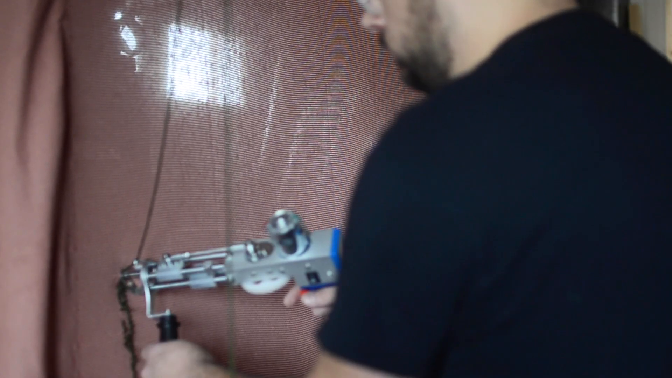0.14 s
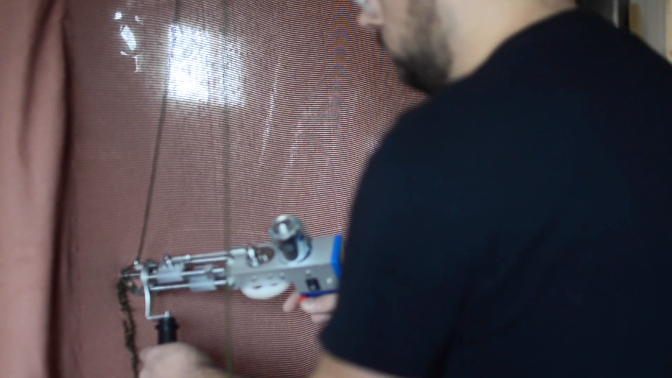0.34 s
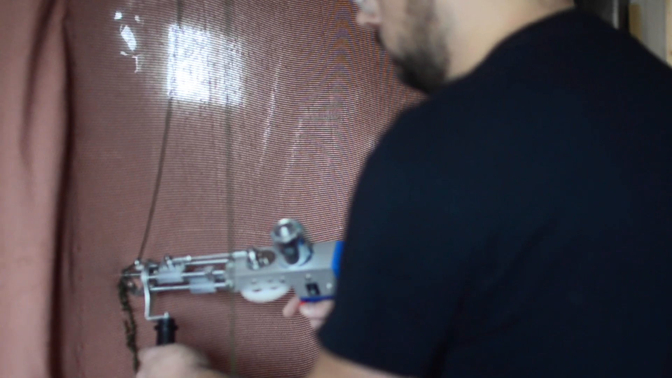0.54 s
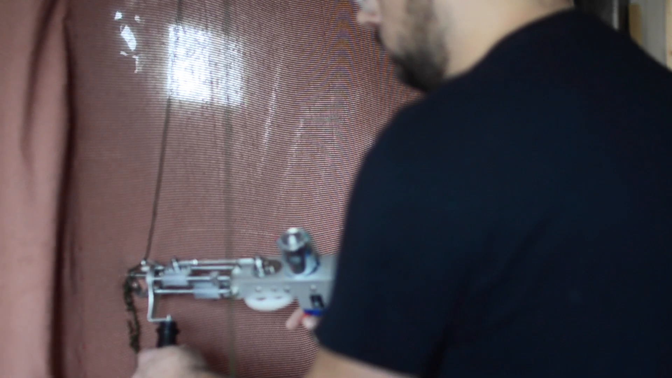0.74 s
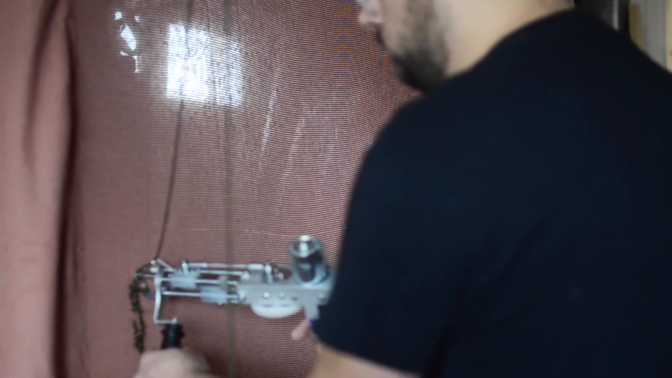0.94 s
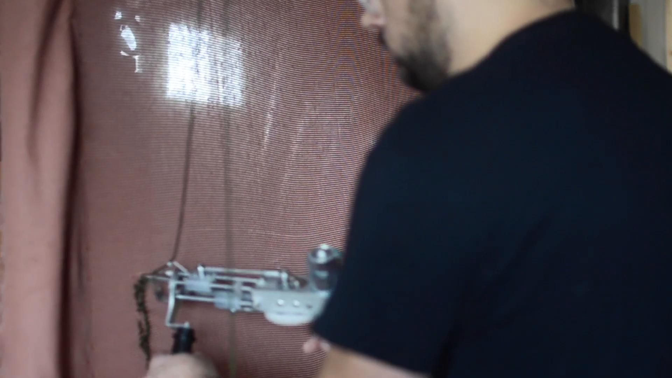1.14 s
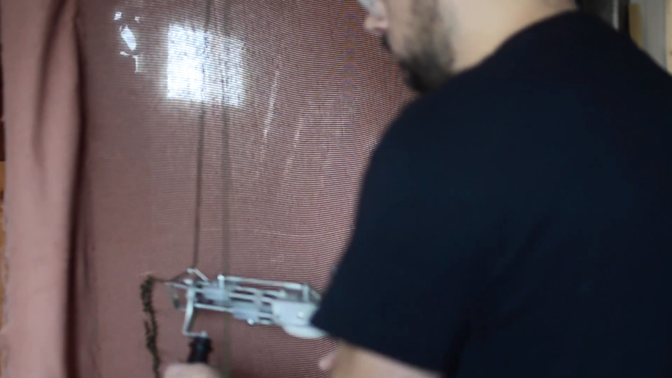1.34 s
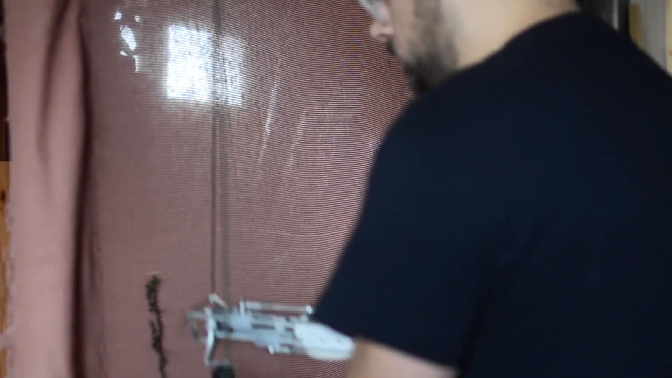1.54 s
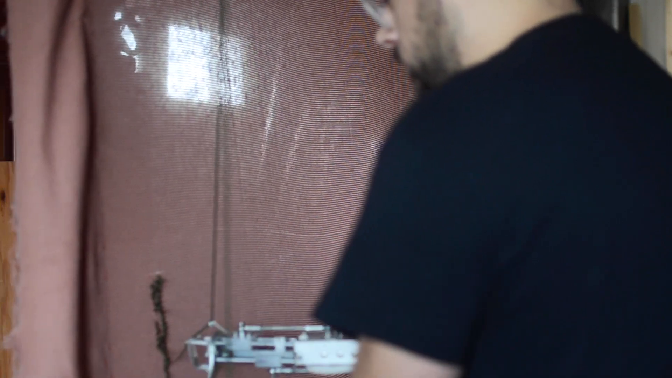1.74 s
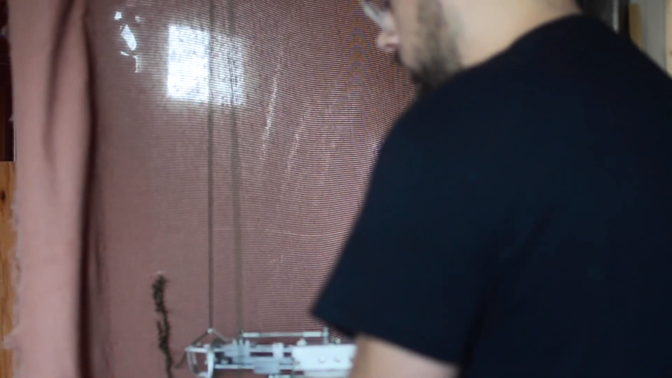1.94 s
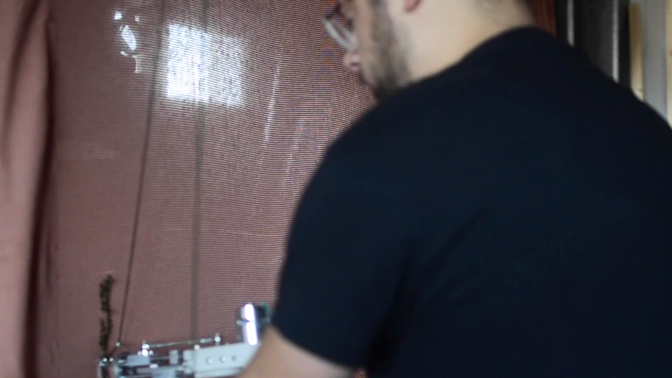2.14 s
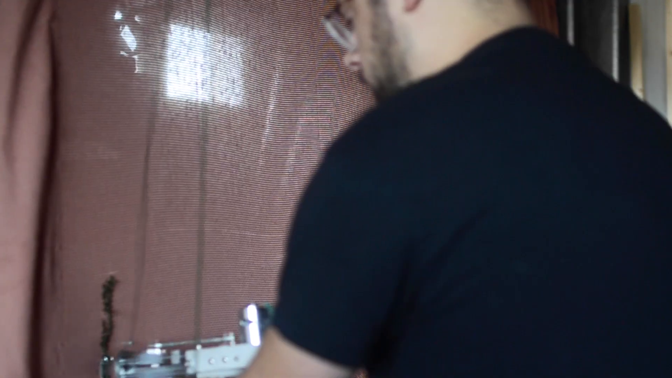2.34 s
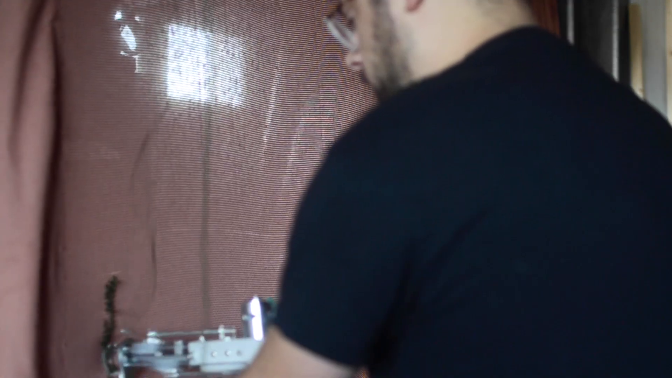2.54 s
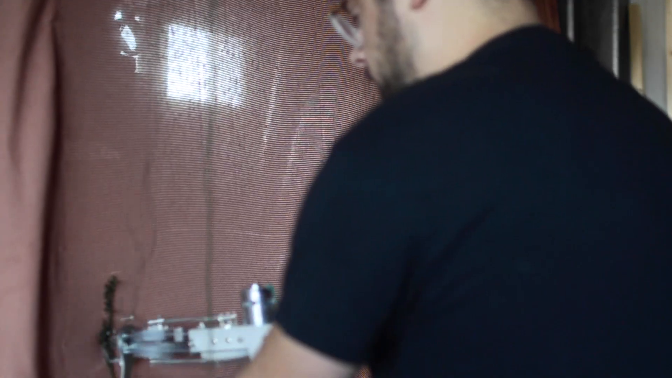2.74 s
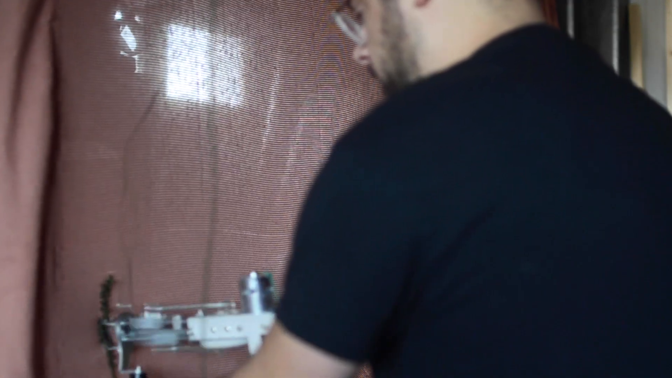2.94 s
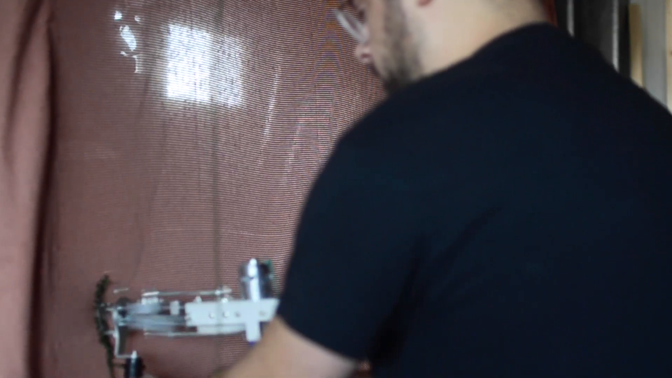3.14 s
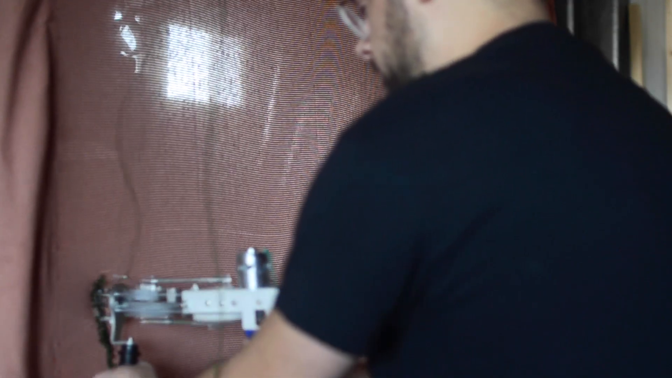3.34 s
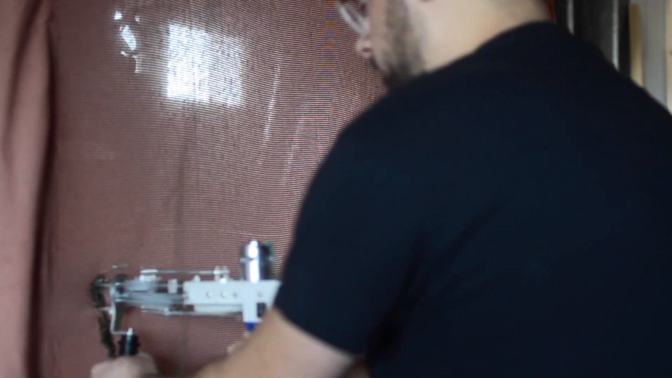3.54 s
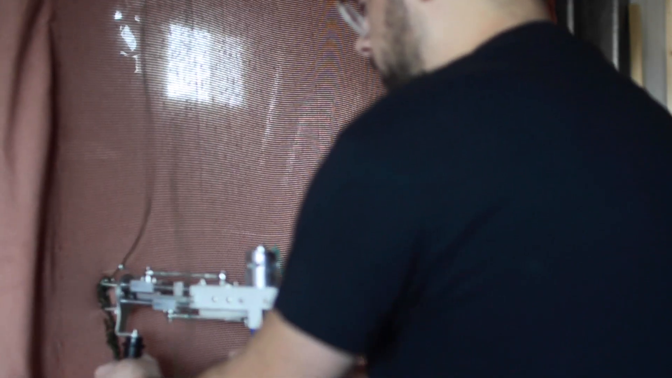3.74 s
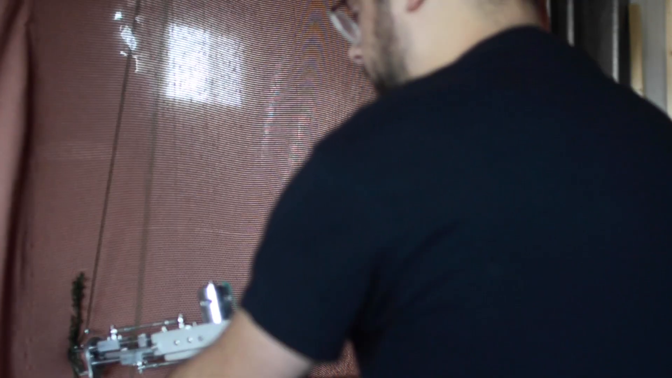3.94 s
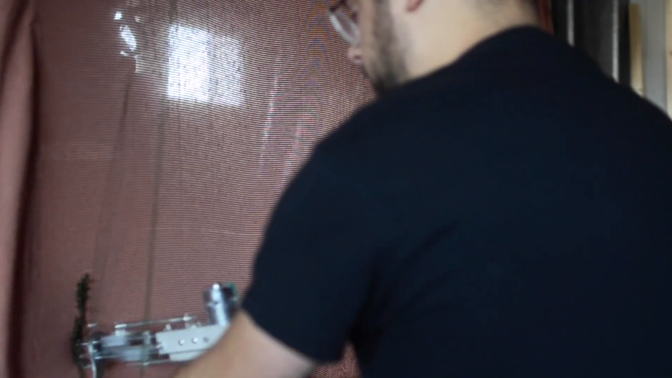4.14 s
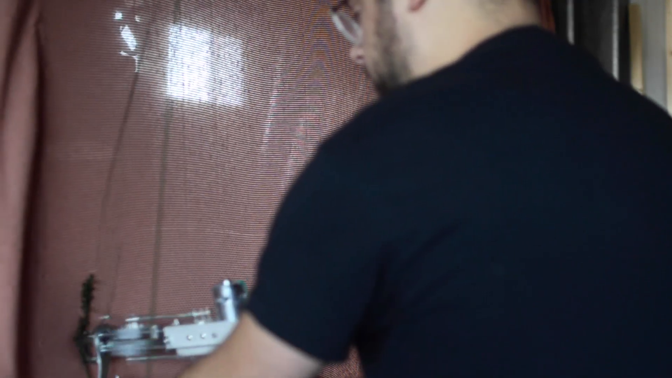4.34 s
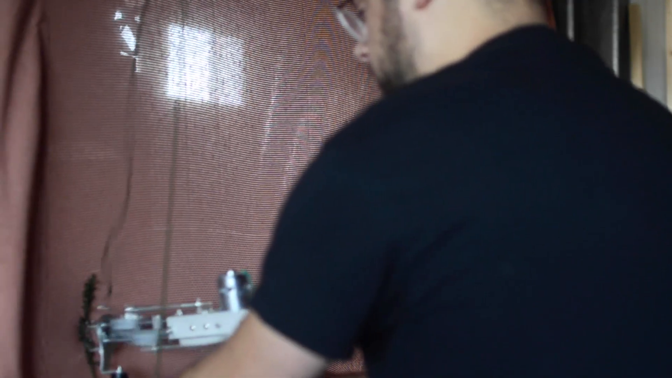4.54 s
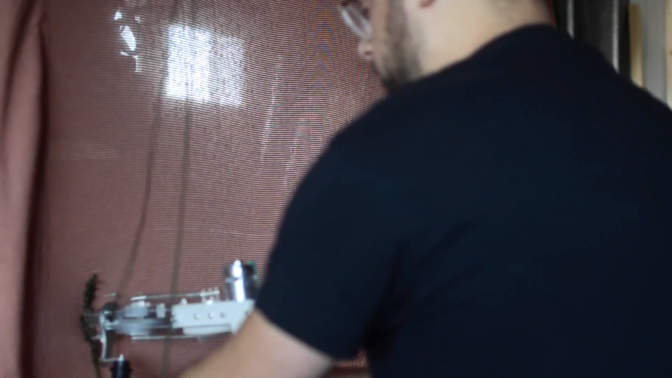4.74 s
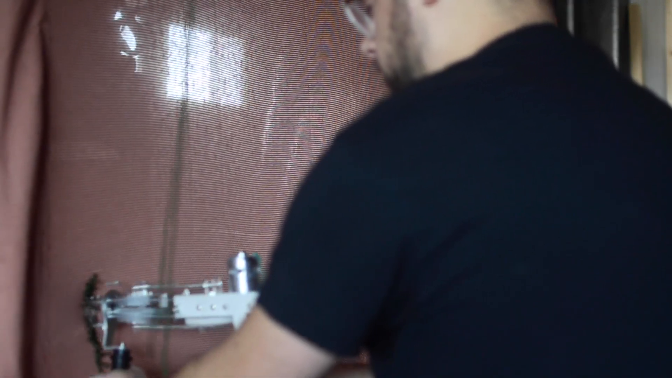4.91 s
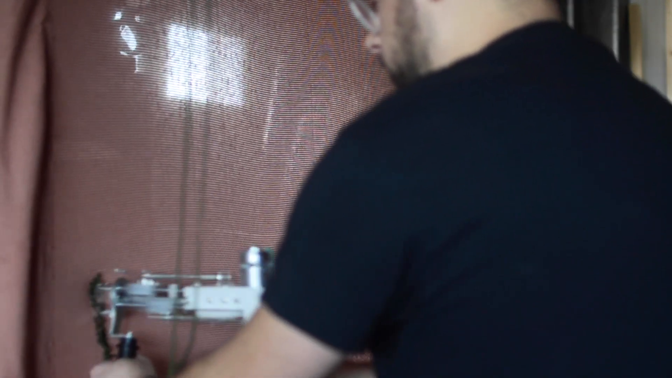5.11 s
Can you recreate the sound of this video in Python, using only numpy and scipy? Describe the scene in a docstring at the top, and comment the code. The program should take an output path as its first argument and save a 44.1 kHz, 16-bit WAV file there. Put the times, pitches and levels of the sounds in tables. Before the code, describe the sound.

A fan hums in a small room while an electric tufting gun clinks, then fires two bursts of fast metallic buzzing chatter.

```python
"""A small room with a fan running; close to the microphone an electric tufting gun punches yarn through cloth.
The fan is coloured noise, housing resonances and hum. Before and between the gun's two bursts it is handled:
short noise bursts clink and knock, detuned sines ring a steel rod, and hiss brushes the cloth.
The trigger switch clicks as each burst starts; gear sines and dense impacts whine and rattle through the
resonant metal frame; on every turn of the crank the needle thumps the cloth (low harmonics) and the
scissors snip (clicks into blade resonances)."""
import sys
import numpy as np
from scipy import signal
from scipy.fft import rfft, irfft
from scipy.io import wavfile

SR = 44100
rng = np.random.default_rng(int(sys.argv[2]) if len(sys.argv) > 2 else 0)


def dump(signal):
    """Clip the signal to [-1, 1] and save it as 16-bit WAV at the path in sys.argv[1]."""
    limited = np.clip(np.atleast_2d(signal).T, -1, 1)
    pcm = np.round(limited * 32767).astype(np.int16)
    wavfile.write(sys.argv[1], SR, pcm)


N = 228155
T = np.arange(N) / SR


def from_db(db):
    """Decibels to gain."""
    return 10 ** (np.asarray(db) / 20)


def rms_one(x):
    """Scale to unit power."""
    return x / np.sqrt(np.mean(x ** 2) + 1e-20)


def colour(x, spectrum):
    """Give x a smooth spectrum that falls away beyond both ends; rms 1."""
    hz, db = np.transpose(spectrum)
    f = np.maximum(np.arange(N // 2 + 1) * SR / N, 1)
    ends = np.minimum(1, f / hz[0]) ** 2 * np.minimum(1, hz[-1] / f) ** 2
    gain = from_db(np.interp(np.log(f), np.log(hz), db))
    return rms_one(irfft(rfft(x) * ends * gain, N))


def noise(spectrum):
    """Coloured noise, rms 1."""
    return colour(rng.standard_normal(N), spectrum)


def drift(rate):
    """Smooth chance with spread 1, changing about rate times a second."""
    r = np.exp(-2 * np.pi * rate / SR)
    wander = signal.lfilter([1], [1, -2 * r, r * r], rng.standard_normal(2 * N))
    return rms_one(wander[N:])  # the first half lets the filter settle


def resonate(x, modes):
    """Parallel damped resonances of alternating sign."""
    out = np.zeros(N)
    for k, (hz, width_hz, db) in enumerate(modes):
        r = np.exp(-np.pi * width_hz / SR)
        poles = [1, -2 * r * np.cos(2 * np.pi * hz / SR), r * r]
        ring = (1 - r * r) / 2 * signal.lfilter([1, 0, -1], poles, x + 1e-18)
        out += (-1) ** k * from_db(db) * ring
    return out


# spectrum of the fan's air: (f/Hz, relative level per Hz/dB)
AIR_SPECTRUM = [(25, -10), (55, -19.5), (85, -8), (125, -16.5), (230, -12.5), (450, -9), (780, -4),
                (1100, -10.5), (1550, -12.5), (2400, -25), (3300, -23), (4500, -36), (7000, -46.5),
                (16000, -46)]
# fan housing resonances: (f/Hz, width/Hz, relative level/dB)
HOUSING_MODES = [(435, 11, -1.5), (594, 15, -2), (736.3, 9.3, 4.5), (857.6, 28, 2.5), (912, 41, -6)]
# fan motor's hum and a faint electrical whistle: (f/Hz, rms level/dB)
HUM_TONES = [(92.3, -63.5), (184.6, -61), (14971, -71), (15030, -76)]


def fan():
    """Nearly steady air noise, the housing's resonances and wavering tones, present throughout."""
    air = from_db(-44 + 0.37 * drift(4)) * noise(AIR_SPECTRUM)
    housing = from_db(-45) * rms_one(resonate(rng.standard_normal(N), HOUSING_MODES))
    hum = np.zeros(N)
    for hz, db in HUM_TONES:
        level = np.sqrt(2) * from_db(db + 1.4 * drift(5.2))
        hum += level * np.sin(2 * np.pi * hz * T + .5 * drift(7.4))
    return air + housing + hum


def decay(start, t60, rise_s=0.00049):
    """An envelope that rises quickly and dies away, 60 dB in t60 seconds."""
    since = np.maximum(T - start, 0)
    return (1 - np.exp(-(since / rise_s) ** 2)) * from_db(-60 * np.minimum(since / t60, 4))


def blows(rows, spectrum):
    """Each blow wakes many damped modes at once: a burst of noise that dies quickly."""
    return noise(spectrum) * sum(from_db(db) * decay(s, t60) for s, db, t60 in rows)


# clinks of handled metal parts, and the trigger switch at 2.362 and 4.023 s: (t/s, level/dB, t60/s)
CLINK_AND_SWITCH_TIMES = [(1.258, -47, 0.39), (1.774, -41.5, 0.24), (2.097, -49, .1), (2.362, -26, 0.13),
                          (3.797, -50, 0.11), (3.911, -45.5, .015), (4.023, -16, 0.031)]
# their bright spectrum: (f/Hz, relative level per Hz/dB)
CLINK_AND_SWITCH_SPECTRUM = [(600, -29), (1600, 8), (3000, 1), (3700, 1), (4600, -15), (7000, -27.5),
                             (15000, -49)]


def clinks_and_switch():
    """Metal parts clink in handling, and the trigger switch clicks: bright, quickly damped blows."""
    return blows(CLINK_AND_SWITCH_TIMES, CLINK_AND_SWITCH_SPECTRUM)


# the rod rings when the gun is tilted: (t/s, level/dB)
ROD_TIMES = [(1.258, -48.5), (1.774, -38), (2.09, -58), (3.795, -54.5)]
# its close modes: (f/Hz, relative level/dB, t60/s)
ROD_MODES = [(3480, -1, 0.39), (3497, 5.5, 0.2), (3535, -1, 0.25)]


def rod():
    """A steel rod's close modes beat as they ring down, while it chatters in its guide."""
    ring = np.zeros(N)
    for s, db in ROD_TIMES:
        for hz, mode_db, t60 in ROD_MODES:
            envelope = from_db(db + mode_db) * decay(s, t60, rise_s=0.0054)
            ring += envelope * np.sin(2 * np.pi * hz * (T - s))
    chatter_db = 2 * np.minimum(drift(60), 1)
    return ring * from_db(chatter_db)


# a knock in handling, and knocks as each burst starts: (t/s, level/dB, t60/s)
KNOCK_TIMES = [(1.595, -27, .12), (2.365, -25, .12), (2.38, -16, .04), (4.041, -15, .05)]
# their spectrum: (f/Hz, relative level per Hz/dB)
KNOCK_SPECTRUM = [(200, -26), (450, -12), (650, -6), (850, 0), (1150, -18), (1700, -16), (2400, -28),
                  (3800, -26), (6000, -36), (12000, -58)]


def knocks():
    """Short hard blows to the gun's body."""
    return blows(KNOCK_TIMES, KNOCK_SPECTRUM)


# hiss of the brushed cloth: (f/Hz, relative level per Hz/dB)
BRUSH_SPECTRUM = [(2000, -6), (4500, 2), (6500, -4), (9000, -18), (12000, -26)]


def brush():
    """Friction along the cloth: one short hiss that leaves a fainter hiss to the end."""
    stroke = np.interp(T, [2.1, 2.115, 2.17, 2.2], [0, 1, .9, 0.21])
    return from_db(-62.5) * stroke * noise(BRUSH_SPECTRUM)


# trigger held: (on t/s, off t/s, relative level/dB)
TRIGGER = [(2.36, 3.664, 0), (4.02, 5.3, .5)]
# the scissors close once a crank turn: (t/s)
SNIP_TIMES = [2.4071, 2.471, 2.5309, 2.5899, 2.6487, 2.7073, 2.7659, 2.8245, 2.8831, 2.9415, 2.9998, 3.058,
              3.1162, 3.1744, 3.2328, 3.2909, 3.3486, 3.406, 3.4634, 3.5206, 3.5778, 3.6355, 4.0618, 4.127,
              4.1865, 4.2453, 4.3037, 4.3617, 4.4193, 4.477, 4.5351, 4.5925, 4.6497, 4.7071, 4.7644, 4.8214,
              4.8781, 4.9347, 4.9912, 5.0478, 5.1048, 5.1618]
TURNS_PER_S = 17.2  # nominal full speed


def crank(spin_up_s, coast_s):
    """Speed (share of full), crank angle (turns, whole at each snip) and drive gain."""
    speed, angle, drive = np.zeros((3, N))
    for on, off, db in TRIGGER:
        held = np.maximum(T - on, 0)
        coast = np.exp(-np.maximum(T - off, 0) / coast_s)
        spin = (1 - np.exp(-held / spin_up_s)) * coast
        free = np.cumsum(spin) * TURNS_PER_S / SR
        at_snip = np.interp([s for s in SNIP_TIMES if on < s < off], T, free)
        # the drag of the cloth makes each turn a little longer or shorter
        drag = np.interp(free, at_snip, np.arange(len(at_snip)) - at_snip)
        angle = np.where(T >= on, free + drag, angle)
        speed += spin
        drive += from_db(db) * (1 - np.exp(-held / 0.015)) * coast ** 2.84
    return speed, angle, drive


# gear train tones: (cycles per turn, rounded when played, relative level/dB, flutter/dB, spin-up change/dB)
GEAR_TONES = [(48, -27, 5, -10.5), (98.43, -23, 2, 2.5), (143.7, -24, 4, -12), (197.9, -24.5, 4, 0.5),
              (248.8, -38.5, 1.5, -10)]


def gear_whine(angle, surge, loads_db, slip_turns, shake):
    """Gear tones locked to the crank; speed swings twice a turn, backlash shakes phase and strength."""
    swing = .0012 * np.sin(2 * np.pi * (2 * angle - .12))
    wheel = angle + swing + slip_turns * drift(25)
    out = np.zeros(N)
    for k, (cycles, db, flutter_db, start_db) in enumerate(GEAR_TONES):
        load_db = (1 - surge) * loads_db[min(k, 2)] + surge * start_db
        level_db = db + load_db + flutter_db * np.minimum(drift(29.7), 1)
        out += from_db(level_db) * np.sin(2 * np.pi * round(cycles) * wheel + shake * drift(120))
    return out


def rattle(angle, per_s, repeat, count=1000):
    """Dense small impacts of loose links: some recur at the same places in every turn, the rest at random."""
    struck = rng.random(count) < per_s / TURNS_PER_S / count
    pattern = rng.standard_normal(count) * struck
    place = np.floor(angle * count).astype(int)
    regular = pattern[place % count] * (np.diff(place, prepend=0) != 0)
    stray = rng.standard_normal(N) * (rng.random(N) < per_s / SR)
    share = np.clip(repeat, 0, 1)
    return np.sqrt(SR / per_s) * (np.sqrt(share) * regular + np.sqrt(1 - share) * stray)


# the cloth's thump: (multiple of the stroke rate, level at full speed/dB)
CLOTH_HARMONICS = [(2, -68), (3, -47.5), (4, -48.5), (5, -44.5), (6, -47), (7, -56), (8, -64.5)]


def cloth(angle, stab_turn):
    """The needle pushes the taut cloth like a drum skin, once a turn."""
    out = np.zeros(N)
    for order, db in CLOTH_HARMONICS:
        level = np.sqrt(2) * from_db(db + 2.9 * drift(4.2))
        out += level * np.cos(2 * np.pi * round(order) * (angle - stab_turn))
    return out


def delay(x, seconds):
    """The same sound, later."""
    return np.interp(T - seconds, T, x, left=0)


# scissor blades: (f/Hz, width/Hz, relative level/dB)
BLADE_MODES = [(6520, 780, -1), (8580, 950, -3), (9140, 1200, -6.5), (10840, 700, -9), (13470, 490, -8),
               (15700, 450, -14)]


def scissors(angle, snip_db, grit_db, shiver_db, bounce_db, bounce_s, reopen_db, reopen_turn):
    """A steel click with gritty cut, shiver and bounce; the blades scrape open later in the turn."""
    clicks = np.zeros(N)
    at = np.round(np.array(SNIP_TIMES) * SR).astype(int)
    clicks[at] = from_db(snip_db + rng.normal(0, 1.0, len(SNIP_TIMES)))
    # both tails die exponentially: time constants in s
    grit, shiver = [signal.lfilter([0, 1], [1, -np.exp(-1 / (s * SR))], clicks + 1e-18)
                    for s in (.0008, .006)]
    tails = from_db(grit_db) * grit + from_db(shiver_db) * shiver
    clicks = clicks + tails * rng.choice([-1, 1], N)
    bounce = from_db(bounce_db) * delay(clicks, bounce_s)
    opening = np.exp(-((angle % 1 - reopen_turn) / .02) ** 2) * rng.standard_normal(N)
    return resonate(clicks + bounce + from_db(reopen_db) * opening, BLADE_MODES)


# load through one turn, from the snip: (turn 0-1, lowest gear tone level/dB, second tone level/dB,
# higher tones level/dB, rattle level/dB, sliding level/dB), all relative
STROKE_LOAD = [(.02, 2.5, -15.5, 4, 0, 5.5), (.14, -5, -6, -7, 5, -5), (.26, -7, 8, 11.5, -1.5, 3.5),
               (.38, -8.5, -9.5, -5, 1, 8.5), (.5, -4, -3, -4, 3.5, -18), (.64, -13, -10, 3, -0.5, -11),
               (.77, -7.5, -7.5, 5.5, 7, 3), (.89, 1.5, 1.5, 3.5, -2, -3)]
# how hard the gun works: (t/s, gear whine level/dB, rattle level/dB, sliding level/dB), all relative
EFFORT_LEVELS = [(2.4, 5, 2, -21.5), (2.5, 0.5, 0, 0), (2.7, 0.5, 1, -2), (2.95, -0.5, 0, 1),
                 (3.15, 1.5, 1, -2), (3.4, -1.5, -0.5, 4), (3.65, -0.5, 1.5, -0.5), (4.05, 1.5, 0, 0),
                 (4.2, -1, 0.5, -3), (4.45, -2, -1, -1.5), (4.7, 0, -0.5, -0.5), (4.9, -0.5, -0.5, 2.5),
                 (5.17, -1, 1, 0)]
# ringing of the gun's frame: (f/Hz, width/Hz, relative level/dB)
FRAME_MODES = [(788, 79, 4), (1244, 20, -3.5), (1709, 274, -10), (2335, 43, 1.5), (3030, 67, -13.5),
               (3176, 67, -8), (4205, 160, -4), (5060, 440, -3), (6660, 740, -3.5)]
# spectrum of the rattling links: (f/Hz, relative level per Hz/dB)
RATTLE_SPECTRUM = [(110, -5), (200, -5.5), (330, -2.5), (600, -4), (740, 5.5), (1050, 3), (1400, 1),
                   (2000, 2), (3000, 5), (4300, -2), (5500, -5.5), (7000, -26), (10000, -26)]
# spectrum of the sliding parts: (f/Hz, relative level per Hz/dB)
SLIDE_SPECTRUM = [(3000, -14), (5000, 14.5), (7000, -13), (8500, 5), (10000, -7.5), (12300, -4.5),
                  (13700, -4), (14500, -7), (16000, -20)]
MOTOR_ORDER, SPRING_HZ = 125, 2144  # motor cycles per crank turn; the spring's pitch


def gun():
    """The running gun, driven by one crank: its metal clatter, and the low thump of the cloth."""
    speed, angle, drive = crank(spin_up_s=.033, coast_s=.075)
    turn, *columns = np.transpose(STROKE_LOAD)
    *loads_db, rattle_db, slide_db = [np.interp(angle, turn, c, period=1) for c in columns]
    s, *efforts_db = np.transpose(EFFORT_LEVELS)
    whine, loose, friction = [from_db(np.interp(T, s, db)) for db in efforts_db]
    # while the motor spins up, its torque presses the teeth together evenly and one tone leads
    surge = sum(np.interp(T - on, [0, .01, .08, .12], [0, 1, 1, 0]) for on, off, db in TRIGGER)

    teeth = whine * gear_whine(angle, surge, loads_db, slip_turns=0.00091, shake=0.67)
    links = loose * from_db(rattle_db) * rattle(angle, per_s=6000, repeat=0.57)
    shaken = from_db(4.0) * teeth + from_db(-27.5 + 2 * surge) * links
    frame = resonate(shaken, FRAME_MODES) + from_db(-6.5) * teeth
    # a lightly damped spring sings whenever the motor's tone passes its pitch
    motor = np.sin(2 * np.pi * MOTOR_ORDER * angle)
    spring = from_db(-34) * resonate(motor, [(SPRING_HZ, 14, 0)])
    clatter = from_db(-26.5) * np.sqrt(speed) * colour(links, RATTLE_SPECTRUM)
    scrape = colour(rattle(angle, per_s=1500, repeat=0.35), SLIDE_SPECTRUM)
    sliding = from_db(slide_db - 42.0) * friction * speed * scrape
    thump = from_db(-6 * surge) * speed ** 4 * cloth(angle, stab_turn=0.187)
    snips = scissors(angle, snip_db=9.5, grit_db=-23.0, shiver_db=-35.5, bounce_db=-11, bounce_s=0.0035,
                     reopen_db=-26, reopen_turn=.43)
    return drive * (frame + spring + clatter + sliding + snips), drive * thump


ROOM_T60_S = 0.22


def room(x, wall_hz):
    """A short diffuse tail, dulled by cloth and curtains."""
    dull = signal.butter(1, min(wall_hz, SR / 3), fs=SR)
    tail = signal.lfilter(*dull, rng.standard_normal(N)) * decay(0.00421, ROOM_T60_S)
    return signal.fftconvolve(x, tail / np.sqrt(np.sum(tail ** 2)))[:N]


# a bump of the gun: (t/s, level/dB, t60/s)
THUD_TIMES = [(4.475, -14, 0.16)]
# its low spectrum: (f/Hz, relative level per Hz/dB)
THUD_SPECTRUM = [(90, -12), (200, -4), (350, -2), (550, -1), (850, 1), (1300, -4), (2200, -18), (6000, -35)]


def thuds():
    """A dull bump of the whole gun wakes its low modes."""
    return blows(THUD_TIMES, THUD_SPECTRUM)


def scene():
    """Fan, handling and gun at one microphone, the gun's metal with a little of the room."""
    contacts = clinks_and_switch() + rod() + knocks() + brush() + thuds()
    metal, thump = gun()
    reverb = from_db(-14.5) * room(metal, wall_hz=4000)
    return (fan() + contacts + metal + reverb + thump)[None]


CUTOFF_HZ = 16000


def record(dry):
    """A steep low-pass cuts the top."""
    return signal.sosfilt(signal.ellip(12, .1, 80, CUTOFF_HZ, fs=SR, output="sos"), dry)


dry = scene()
out = record(dry)
dump(out)
```